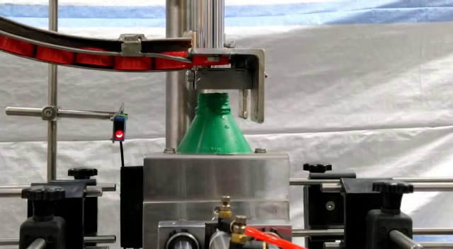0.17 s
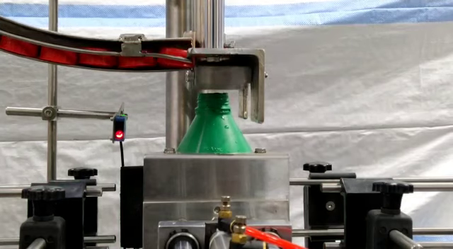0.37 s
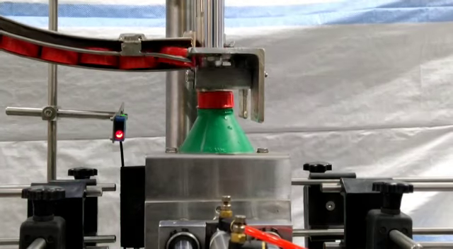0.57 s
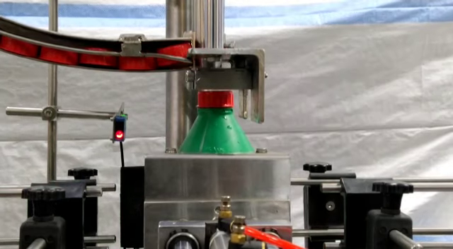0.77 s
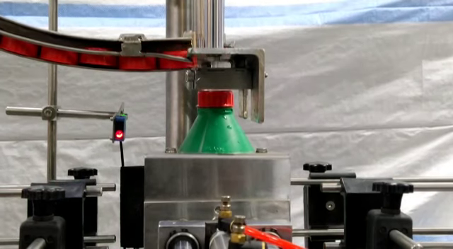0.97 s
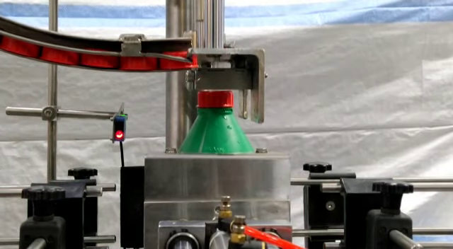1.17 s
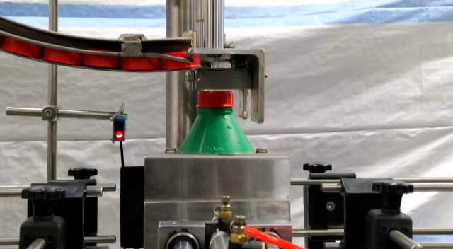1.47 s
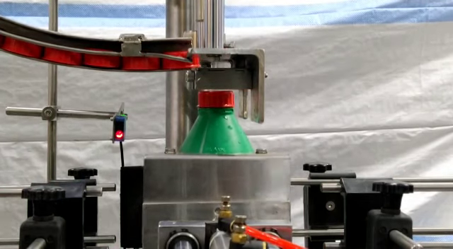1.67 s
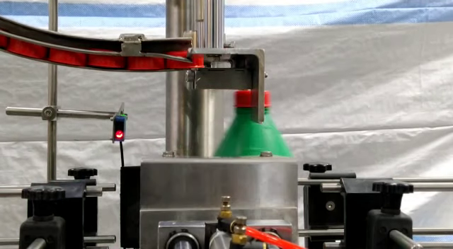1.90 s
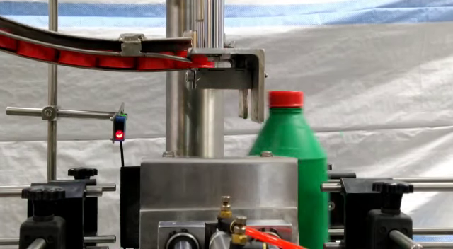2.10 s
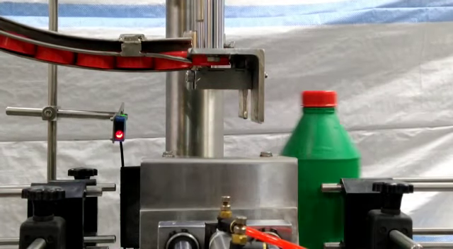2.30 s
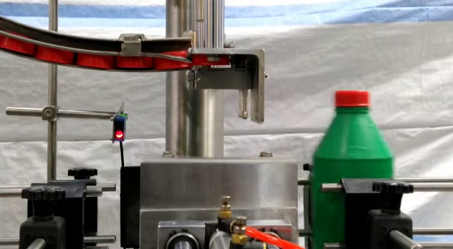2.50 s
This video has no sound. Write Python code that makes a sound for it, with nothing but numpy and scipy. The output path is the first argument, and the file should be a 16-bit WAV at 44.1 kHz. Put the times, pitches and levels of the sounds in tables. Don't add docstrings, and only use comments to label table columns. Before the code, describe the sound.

Close up in a lightly reverberant workshop, a bottle capper fires rapid air blasts and metal knocks, squeals briefly, then puffs and clunks more sparsely before quieting to a low conveyor motor hum.

```python
import sys
import numpy as np
from scipy import signal
from scipy.fft import rfft, irfft
from scipy.io import wavfile
from scipy.ndimage import uniform_filter1d

SR = 44100
rng = np.random.default_rng(int(sys.argv[2]) if len(sys.argv) > 2 else 0)


def makeup_ratio(level_db):
    decades = np.asarray(level_db, float) / 20
    return 10 ** decades


def wav_out(sig):
    wavfile.write(sys.argv[1], SR, np.round(np.clip(np.atleast_2d(sig).T, -1, 1) * 32767).astype(np.int16))


N = 116865

# (frequency [Hz], density [dB per Hz])
SHOP_SPECTRUM = [(12, -48), (20, -20.5), (268, 5.5), (1840, -11.5), (3900, -11.5), (5380, -9),
                 (5830, -13.5), (8030, -9), (12000, -13.5), (15600, -25), (22000, -120)]
SHOP_DB = -33
# (frequency [Hz], level [dB])
MOTOR_LINES = [(84, -55), (167, -60.5), (252, -77), (330, -48.5)]

# (start [s], open time [s], level [dB], rise [s], roar relative to hiss [dB])
VENTS = [(-.12, 0.11, -20, .01, -0.5), (.14, 0.045, -39.5, 0.021, -0.5), (.194, .004, -20.5, 0.0023, -3.5),
         (0.212, 0.2, -9.5, 0.013, -11.5), (.285, 0.041, -32, 0.017, 10.5),
         (0.385, 0.082, -14.5, 0.008, -3), (.442, 0.087, -19.5, 0.014, -5.5), (.538, 0.012, -26, 0.0027, 5),
         (0.551, 0.11, -11.5, 0.022, -2), (0.669, 0.092, -8, 0.038, -11), (0.858, 0.0087, -42, 0.0032, 13),
         (0.993, 0.0092, -14, 0.0065, -0.5), (1.04, 0.12, -10.5, 0.019, -11),
         (1.185, 0.061, -10.5, 0.0048, -9), (1.254, 0.041, -19.5, 0.0014, 2.5),
         (1.388, 0.015, -11.5, 0.0072, -5), (1.535, 0.045, -13, 0.034, -9.5),
         (1.592, 0.023, -17.5, 0.0017, -4.5), (1.707, 0.07, -11.5, 0.029, -14),
         (1.789, 0.021, -26.5, 0.0026, 3.5), (1.92, 0.061, -30.5, 0.038, 4.5),
         (1.994, 0.012, -38, 0.0055, 9.5), (2.184, 0.03, -19.5, 0.003, -15),
         (2.185, 0.068, -10, 0.039, -12), (2.289, 0.045, -19.5, 0.0024, -2)]
SAG_DB_PER_S, FLUTTER_DB = 28, 1.5
CLOSE_S, CLOSE_S_PER_OPEN_S = 0.0072, 0.25
ROAR_RISE_RATIO = 1.57
# (frequency [Hz], density [dB per Hz])
HISS_LEFT = [(1500, -78), (4000, -13.5), (6500, -7.5), (9000, -5), (11500, 2), (16000, -1)]
# (frequency [Hz], density [dB per Hz])
HISS_RIGHT = [(1500, -21.5), (4000, -14), (6500, -7.5), (8800, -1.5), (11500, -6.5), (16000, -68)]
# (frequency [Hz], density [dB per Hz])
ROAR_SPECTRUM = [(150, -8), (600, 2.5), (1300, 0.5), (2800, 1.5), (4200, 2), (6500, -0.5), (12000, -4)]

# (start [s], length [s], level [dB])
STROKES = [
    (-.05, 0.07, -24),
    (0.225, 0.25, -20),
    (0.526, 0.28, -21.5),
    (1.066, 0.32, -25.5),
    (1.42, 0.24, -26.5),
    (1.74, 0.086, -33.5),
    (1.955, 0.15, -26),
    (2.196, 0.22, -28.5),
]
RUB_PER_S, RUB_SCATTER_DB = 300, 2.5
# (time [s], level [dB], centre of excited region [Hz])
SLAMS = [(0.207, -17.5, 95), (0.215, -18, 454), (.224, -19, 435), (.233, -17, 484), (.251, -21, 520),
         (.264, -23, 560), (0.301, -16.5, 294), (.312, -10.5, 670), (.328, -15.5, 260), (.342, -14.5, 640),
         (0.376, -23, 620), (0.391, -15, 1500), (.42, -17, 110.4), (.437, -19, 191), (.443, -19.5, 513),
         (.481, -21.5, 436), (0.523, -13, 2470), (.539, -13.5, 576), (0.567, -5, 4000), (0.585, -15.5, 320),
         (.611, -10.5, 2110), (0.634, -16, 516), (0.656, -11, 4540), (.667, -8.5, 590), (.675, -16.5, 580),
         (.692, -21, 513), (0.736, -28, 85), (.782, -22, 400), (.858, -18, 2140), (.868, -18, 1540),
         (1, -18, 1190), (1.043, -20, 96), (1.056, -17.5, 450), (1.071, -23, 417), (1.176, -28, 85),
         (1.192, -15.5, 1150), (1.257, -11, 475), (1.275, -18.5, 500), (1.286, -21.5, 540),
         (1.32, -19.5, 404), (1.392, -16, 1950), (1.413, -20.5, 566), (1.559, -17, 447),
         (1.595, -25.5, 290), (1.594, -16, 2140), (1.712, -22, 85), (1.73, -15.5, 457), (1.953, -23, 221),
         (1.962, -24, 85), (1.988, -18.5, 275), (2.016, -20, 272), (2.035, -25.5, 260), (2.058, -24.5, 300),
         (2.184, -23, 89), (2.197, -18.5, 280), (2.215, -21.5, 416), (2.263, -22.5, 490),
         (2.296, -16.5, 298), (2.2965, -9, 600), (2.529, -31.5, 250)]
SLAM_OCTAVES, SLAM_SCATTER_DB, CONTACT_S, CRACK_DB = 0.64, 1.5, 0.003057, -8.5
OFF_REGION_DB, LOWEST_MODE_EXTRA_DB = -20, -18
# (frequency [Hz], level [dB], ring time T60 [s])
FRAME_MODES = [(85, -12, 0.094), (167, -11, 0.22), (201, -11.5, 0.096), (253, -9.5, 0.19),
               (283.2, -10, 0.19), (400, -10, 0.085), (462, -10.5, 0.16), (524, -12.5, 0.12),
               (580, -10.5, 0.096), (631, -13.5, 0.085), (735, -11.5, 0.056), (1150, -14, .1),
               (1500, -11, 0.05), (2140, -10, 0.045)]
RING_SCALE, BODY_LOW_HZ, EAR_LAG_HZ = 0.91, 78, 950

# (start [s], length [s], pitch [Hz], bandwidth [Hz], level [dB])
WHISTLES = [
    (.682, .055, 6278, 30, -16.5),
    (0., .05, 5300, 120, -37),
    (1.71, .019, 7300, 380, -15),
    (0., .2, 10700, 90, -43),
    (1.452, .085, 253, 3, -27),
    (.64, .05, 4200, 150, -27),
    (2.2, .015, 6600, 300, -25),
]
WHISTLE_TURN_HZ = 7000

STEREO_SPLIT_HZ, TREBLE_SHARED = 790, 0.036
ROOM_T60_S = 0.47
VENT_ROOM_DB, FRAME_ROOM_DB, WHISTLE_ROOM_DB = -6, -2.5, -13
TOP_HZ, ABOVE_TOP_DB = 11985, -9.5


def level(x, db):
    return x * makeup_ratio(db) / np.sqrt(np.mean(x ** 2))


def shape(x, points):
    hz, db = np.array(points, float).T
    n = x.shape[-1]
    f = np.maximum(np.arange(n // 2 + 1) * SR / n, 1)
    return irfft(rfft(x) * makeup_ratio(np.interp(np.log(f), np.log(hz), db)), n)


def ring(x, hz, t60_s):
    pole = np.exp(2j * np.pi * hz / SR - np.log(1000) / (t60_s * SR))
    return signal.lfilter([1], [1, -pole], x)


def gate(start_s, length_s, rise_s, fall_s, sag_db_per_s=0.):
    t = np.arange(N) / SR - start_s
    rise = np.sin(np.pi / 2 * np.clip(t / rise_s, 0, 1)) ** 1.2
    sag = makeup_ratio(-sag_db_per_s * np.clip(t, 0, length_s))
    return rise * sag * np.exp(-np.maximum(t - length_s, 0) / fall_s)


def walk(rate_hz):
    k = int(SR / rate_hz)
    steps = np.repeat(rng.standard_normal(N // k + 1), k)
    return 1.32 * uniform_filter1d(uniform_filter1d(steps, k), k)[:N]


def pair():
    mid, side = rng.standard_normal((2, N))
    highpass = signal.butter(2, STEREO_SPLIT_HZ, "high", fs=SR)
    side = signal.lfilter(*highpass, side) * (1 - TREBLE_SHARED)
    return mid + side * np.array([[1], [-1]])


def room(x, db):
    t = np.arange(SR // 2) / SR
    decay = np.exp(-np.log(1000) * t / ROOM_T60_S)
    tail = pair()[:, :len(t)] * decay * np.clip(t / 0.02, 0, 1)
    return x + signal.fftconvolve(x, level(tail, db) / np.sqrt(len(t)), axes=1)[:, :N]


def shop():
    t = np.arange(N) / SR
    noise = 0
    for hz in 30 * 2 ** np.arange(0, 9.1):
        octave = [(hz / 2, -30), (hz / 1.51, -3), (hz, 0), (hz * 1.48, -3), (hz * 2, -30)]
        noise = noise + shape(pair(), octave) * makeup_ratio(1.0 * walk(9.8))
    motor = sum(makeup_ratio(db + 3.6 * walk(6.1)) * np.sin(2 * np.pi * hz * t) for hz, db in MOTOR_LINES)
    return level(shape(noise, SHOP_SPECTRUM), SHOP_DB) + motor


def vents():
    hiss_power, roar_power = 0, 0
    for start_s, open_s, db, rise_s, roar_db in VENTS:
        close_s = CLOSE_S + CLOSE_S_PER_OPEN_S * open_s
        fast = gate(start_s, open_s, rise_s, close_s, SAG_DB_PER_S)
        slow = gate(start_s, open_s, rise_s * ROAR_RISE_RATIO, close_s, SAG_DB_PER_S)
        hiss_power = hiss_power + fast ** 2 * makeup_ratio(2 * db)
        roar_power = roar_power + slow ** 2 * makeup_ratio(2 * (db + roar_db))
    left, right = pair()
    hiss = level(np.array([shape(left, HISS_LEFT), shape(right, HISS_RIGHT)]), 0)
    hiss = hiss * np.sqrt(hiss_power) * makeup_ratio(FLUTTER_DB * walk(62.96))
    roar = level(shape(pair(), ROAR_SPECTRUM), 0)
    return hiss + roar * np.sqrt(roar_power) * makeup_ratio(0.48 * walk(90))


def rubbing():
    moving = sum(makeup_ratio(db) * gate(s, d, 0.015, 0.024) for s, d, db in STROKES)
    slips = rng.random(N) < RUB_PER_S / SR
    size = makeup_ratio(RUB_SCATTER_DB * rng.exponential(size=N))
    return moving * slips * size * rng.choice([-1, 1], N)


def slam_push(hz, floor_db):
    push = np.zeros(N)
    for time_s, db, centre_hz in SLAMS:
        scatter, lag = rng.standard_normal(2)
        region_db = max(-6 * (np.log2(hz / centre_hz) / SLAM_OCTAVES) ** 2, floor_db)
        at = int((time_s + CONTACT_S * abs(lag)) * SR)
        push[at] += makeup_ratio(db + 2.0 + SLAM_SCATTER_DB * scatter + region_db)
    return push


def cracks():
    hits = np.zeros(N)
    hits[[int(s * SR) for s, _, _ in SLAMS]] = [makeup_ratio(db + CRACK_DB) for _, db, _ in SLAMS]
    burst = np.convolve(hits, gate(0, 0.0007, 0.00057, 0.0014)[:512])[:N]
    return burst * level(shape(pair(), [(200, -23), (800, 30.0), (3000, 36), (9000, 7.0)]), 0)


def frame():
    rub = rubbing()
    body = cracks()
    for k, (hz, db, t60_s) in enumerate(FRAME_MODES):
        floor_db = OFF_REGION_DB + LOWEST_MODE_EXTRA_DB * (k == 0)
        push = rub * 0.2 + slam_push(hz, floor_db)
        lag = (-1) ** k * min(hz / EAR_LAG_HZ, 1) * np.array([[.8], [-.8]])
        body = body + makeup_ratio(db) * (ring(push, hz, t60_s * RING_SCALE) * np.exp(1j * lag)).imag
    return signal.lfilter(*signal.butter(2, BODY_LOW_HZ, "high", fs=SR), body)


def whistles():
    out = 0
    for start_s, length_s, hz, width_hz, db in WHISTLES:
        tone = ring(rng.standard_normal(N), hz, np.log(1000) / (np.pi * width_hz))
        steady = tone / abs(tone) ** 0.85
        tone = steady * gate(start_s, length_s, 0.0024, 0.0094)
        sounding = tone[int(start_s * SR):int((start_s + length_s) * SR)]
        tone = tone / np.sqrt(np.mean(abs(sounding) ** 2))
        ears = np.exp(1j * np.array([[0], [hz / WHISTLE_TURN_HZ]]))
        out = out + makeup_ratio(db) * (tone * ears).imag
    return out


def scene():
    machine = room(vents(), VENT_ROOM_DB) + room(frame(), FRAME_ROOM_DB) + room(whistles(), WHISTLE_ROOM_DB)
    return shop() + machine


def low_pass(x):
    return signal.sosfilt(signal.butter(12, 15740, fs=SR, output="sos"), x)


def record(dry):
    x = shape(dry, [(20, -8), (70, 0), (TOP_HZ, 0), (TOP_HZ + 120, ABOVE_TOP_DB), (15700, -18), (15900, -80)])
    mix = np.tanh(1.092 * x) / 1.072
    return low_pass(mix)


dry = scene()
out = record(dry)
wav_out(out)
```